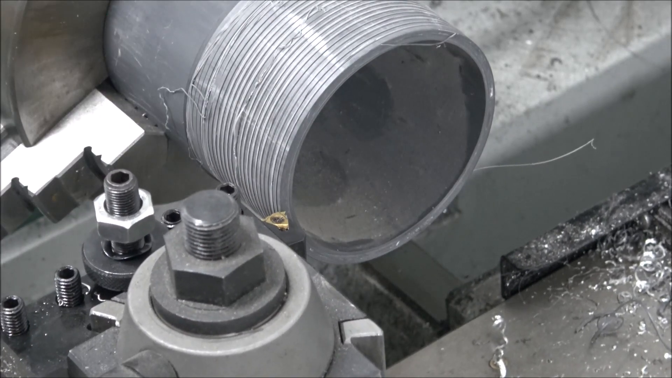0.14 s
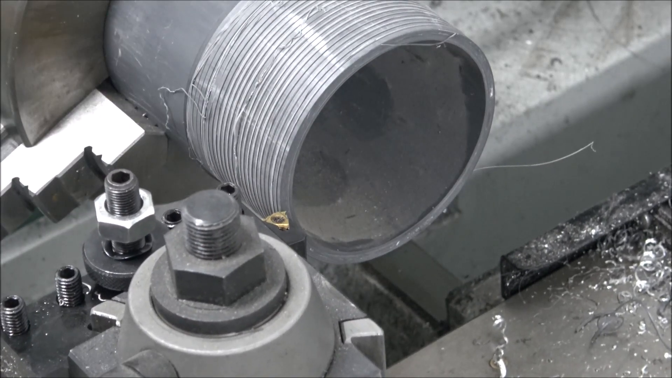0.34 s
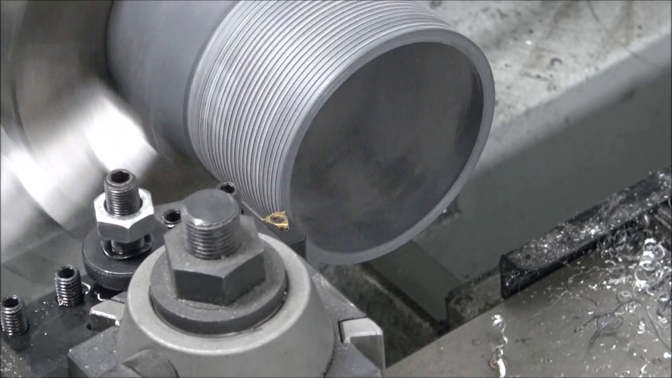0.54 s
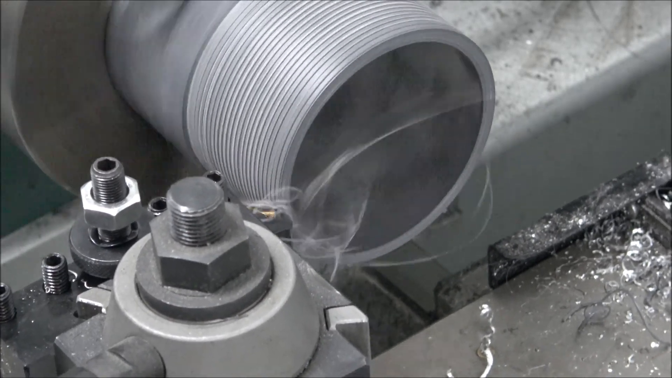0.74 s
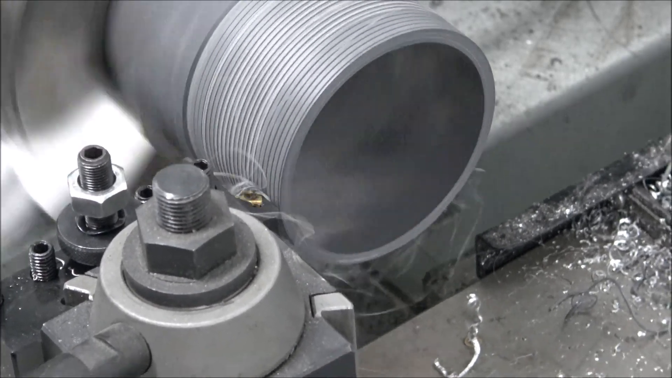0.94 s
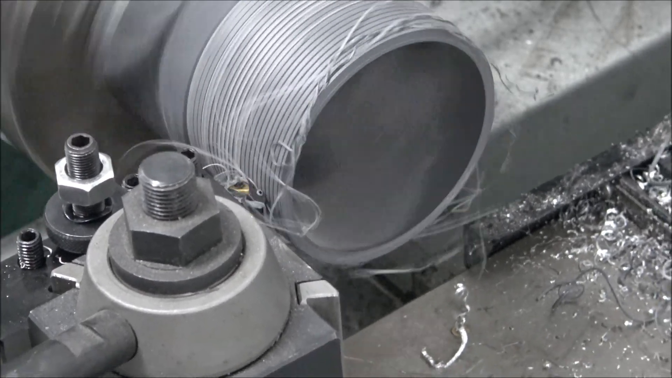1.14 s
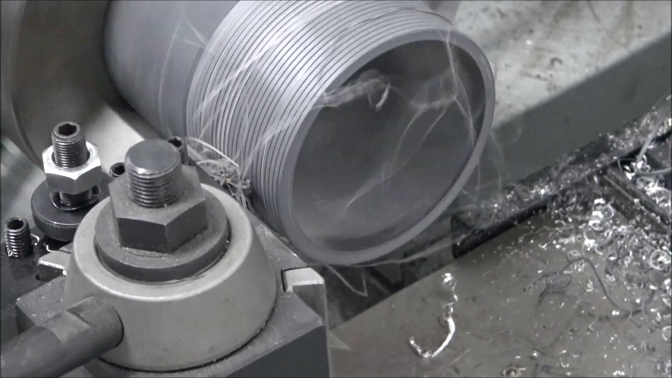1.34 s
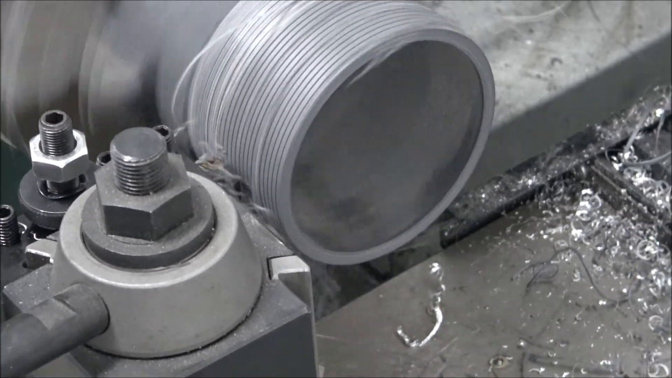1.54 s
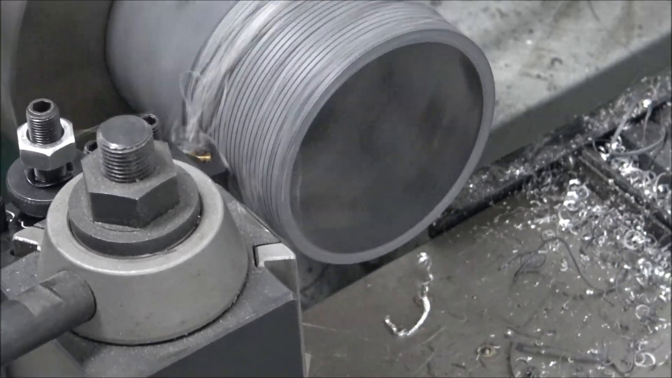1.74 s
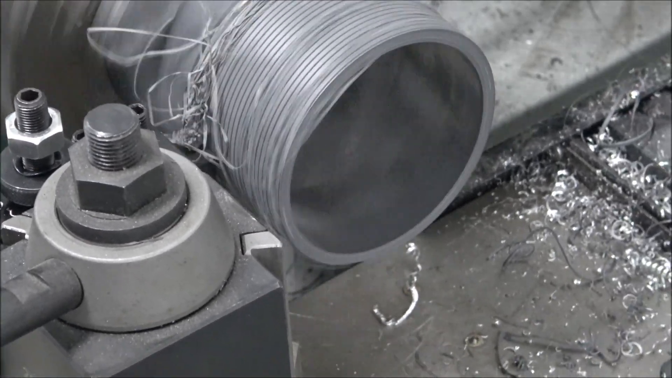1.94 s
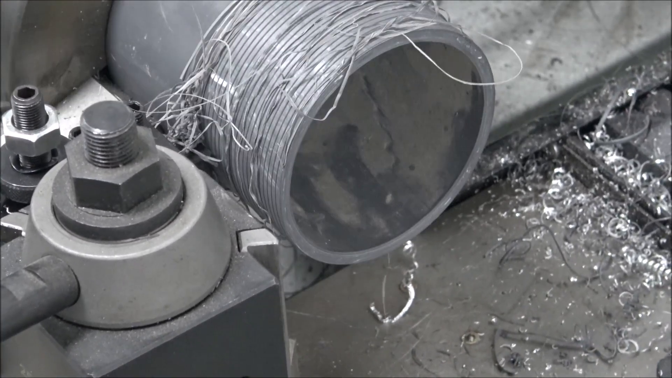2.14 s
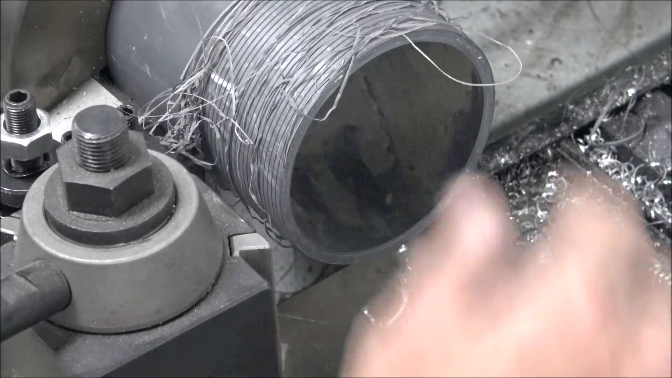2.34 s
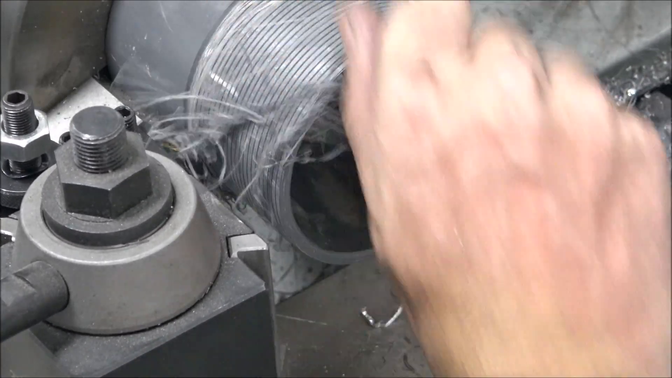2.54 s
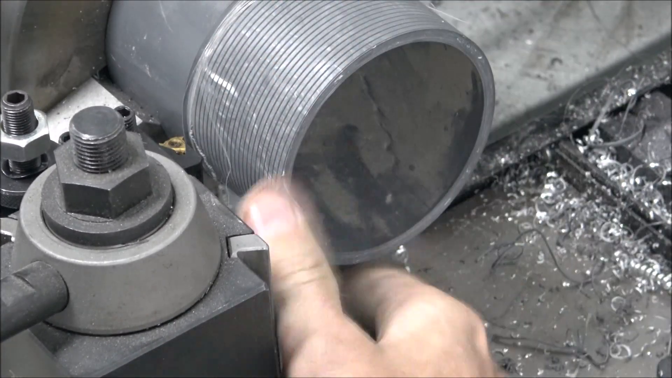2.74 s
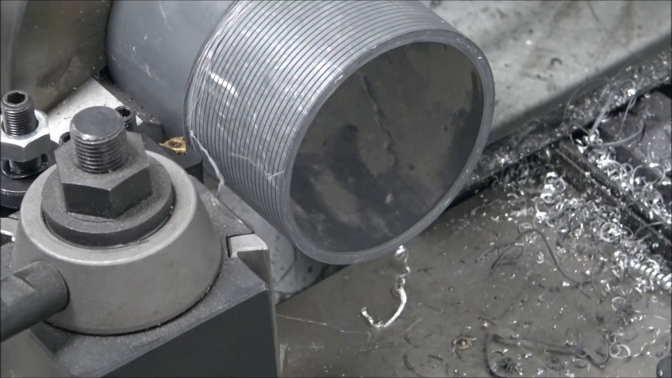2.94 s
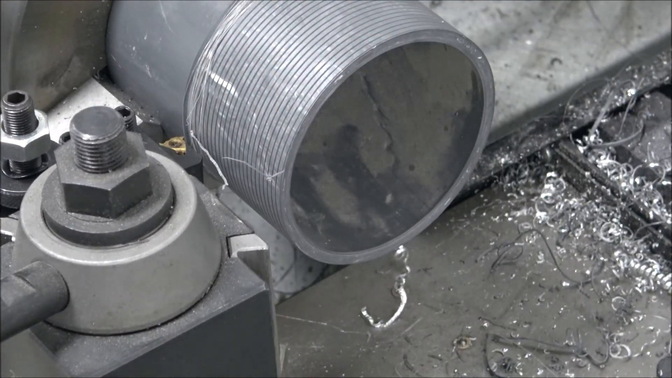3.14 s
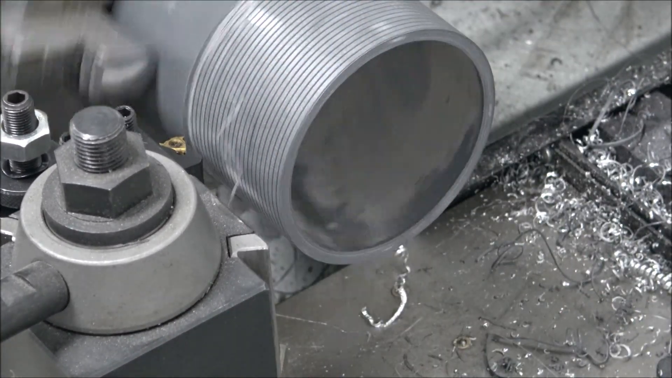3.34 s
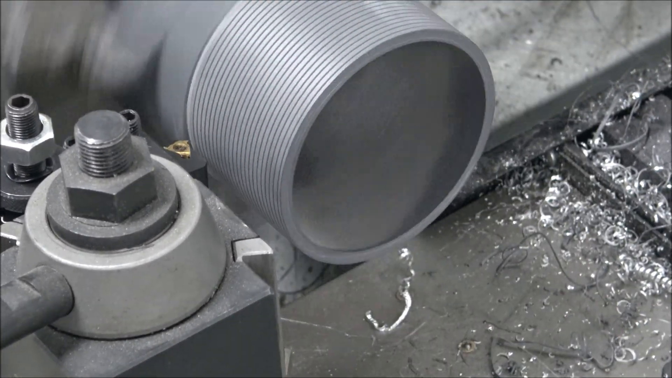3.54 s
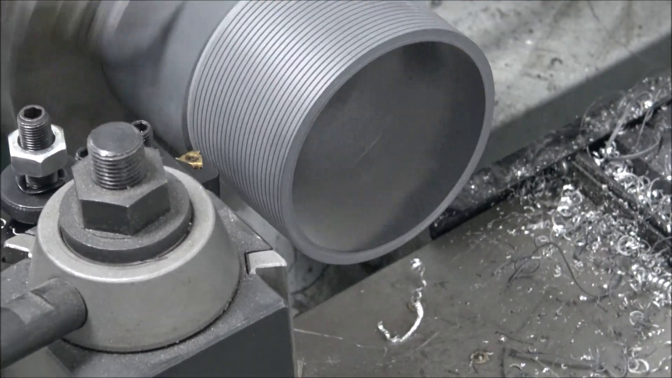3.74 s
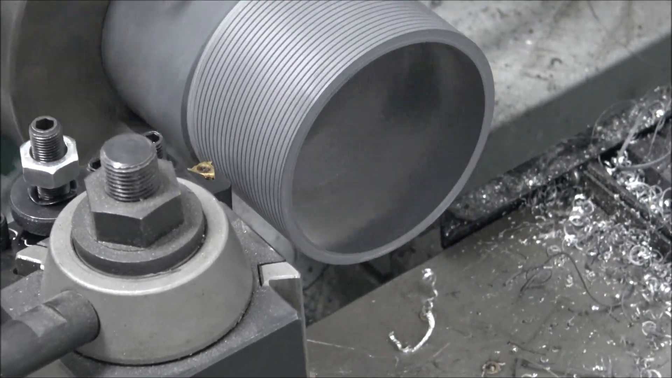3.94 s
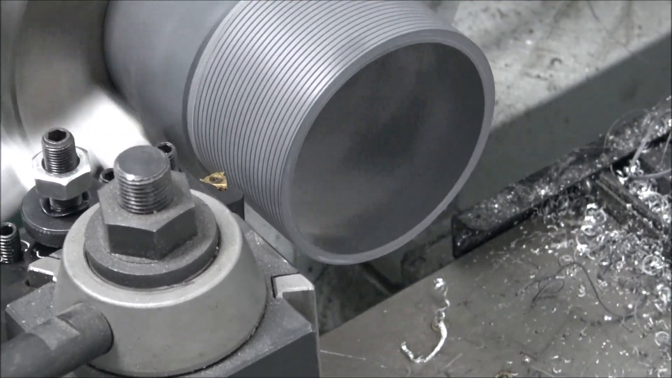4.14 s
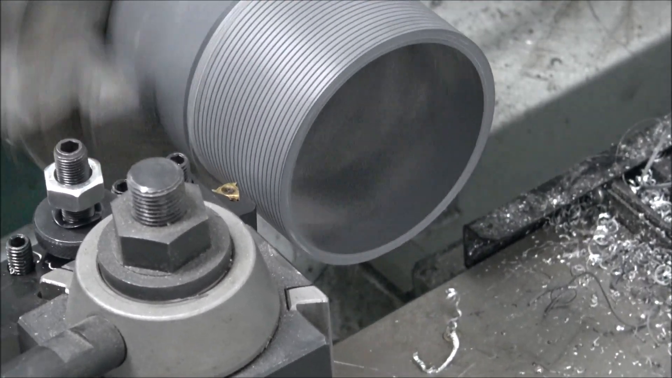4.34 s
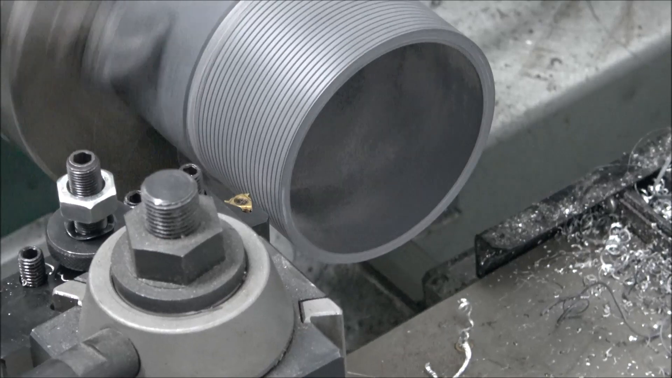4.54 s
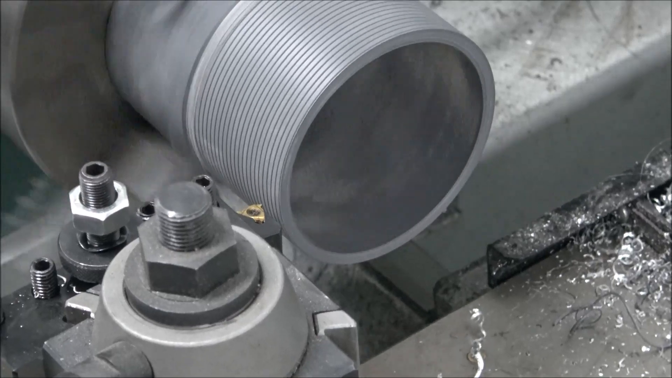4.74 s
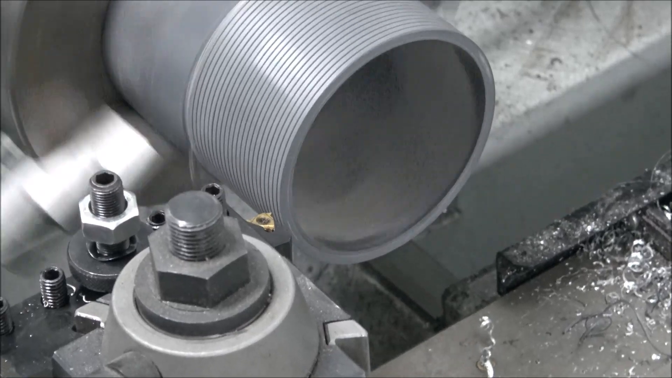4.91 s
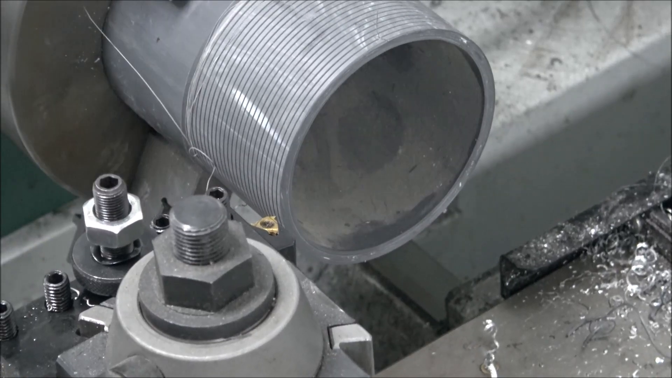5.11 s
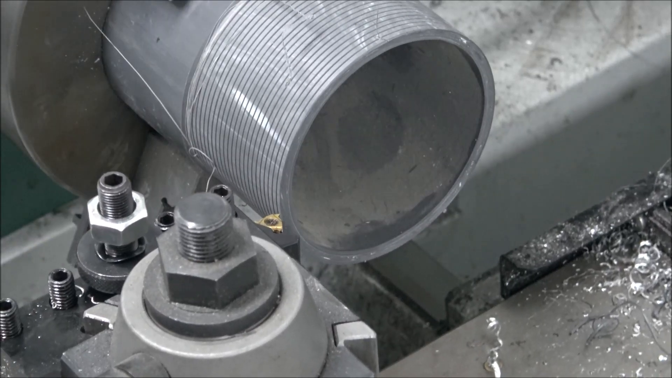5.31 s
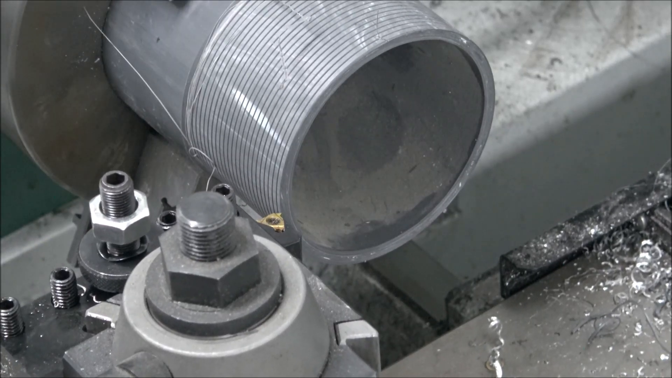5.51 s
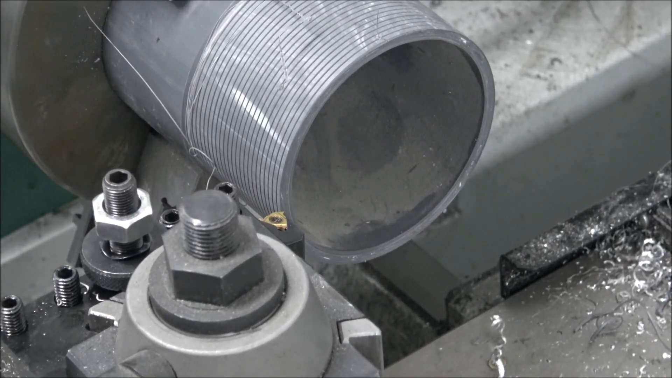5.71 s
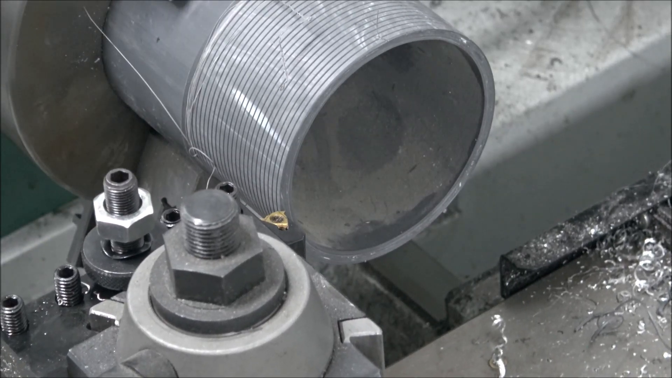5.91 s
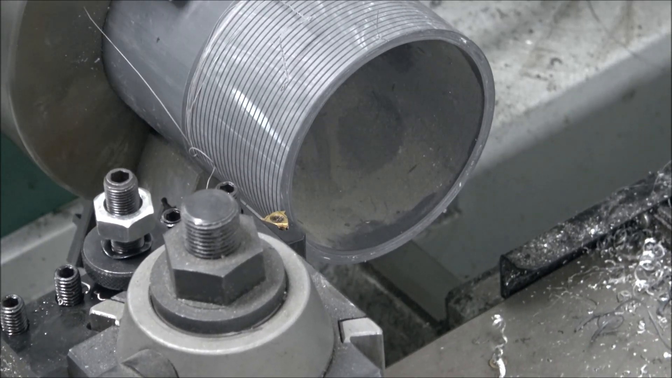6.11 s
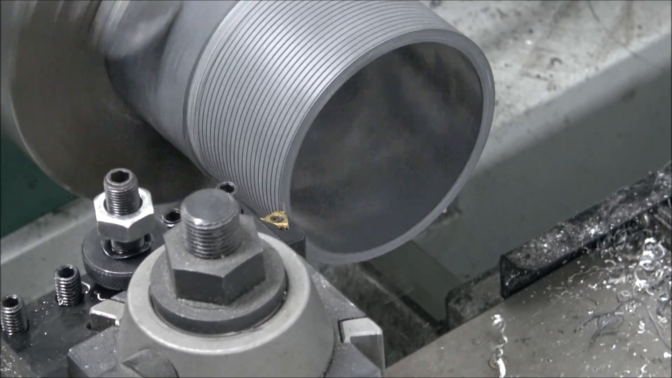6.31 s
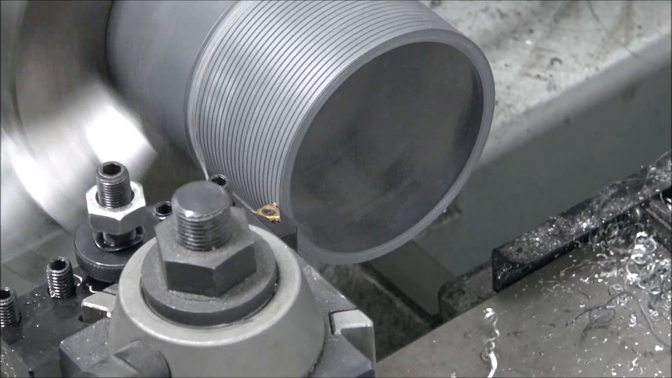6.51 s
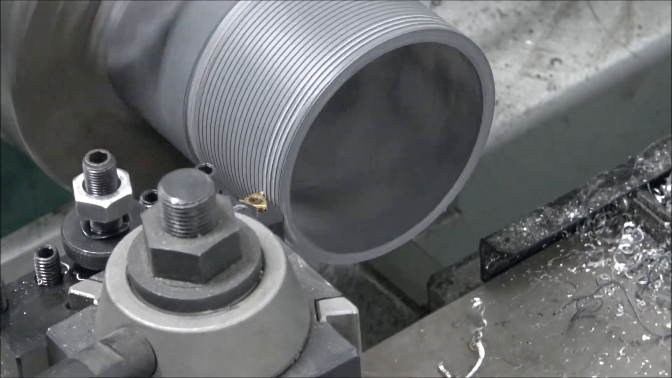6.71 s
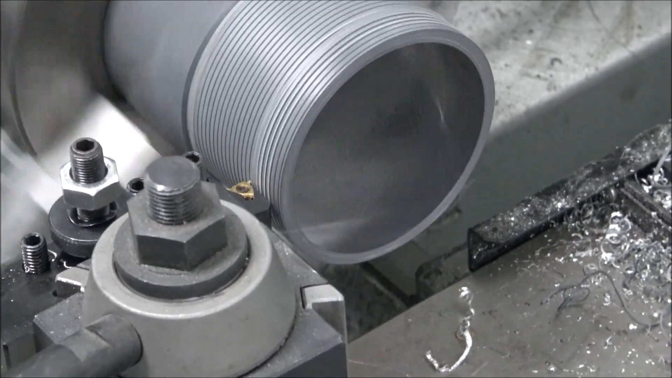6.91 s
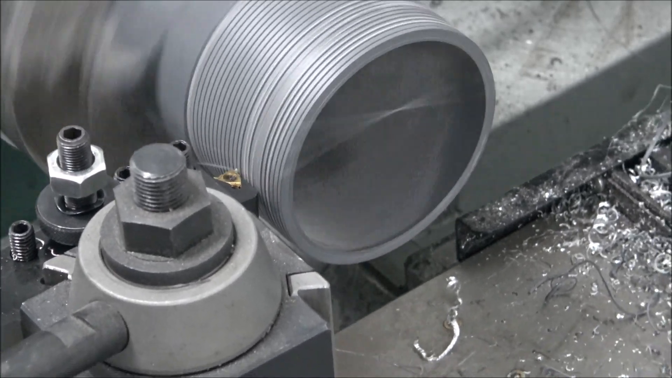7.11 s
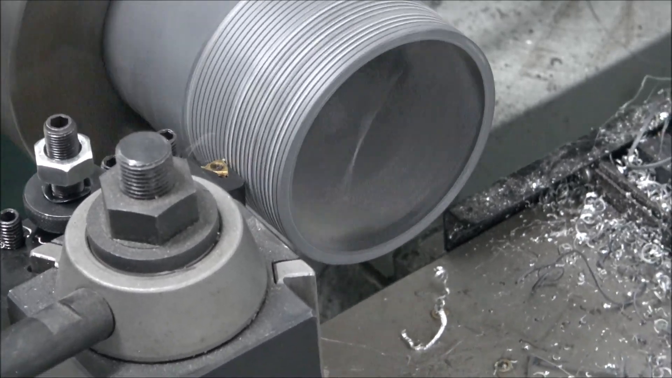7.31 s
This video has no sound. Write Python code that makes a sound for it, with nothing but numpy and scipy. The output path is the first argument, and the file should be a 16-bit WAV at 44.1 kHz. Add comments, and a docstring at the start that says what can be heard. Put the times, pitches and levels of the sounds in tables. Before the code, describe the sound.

A steady fan, airy rush over a low wavering hum, lies beneath everything in a dry workshop, heard close. Thin metal strands rustle faintly at the start. At 0.4 s gear play knocks and a lathe spins up in about 0.2 s with a rough rising howl, settling into a loud, bright gear rattle with piercing steady whines and very high drive singing; a thin whistle joins around 1.1 s. At 1.9 s a snap begins braking; pitch falls and a hard clank comes near 2.05 s. In the quiet, swarf rustles around 2.5 s and on past 3 s, with a light click at 3.2 s. A heavy knock and growling slaps at 3.35 s launch the reverse run, differently pitched, until it brakes at 4.9 s, ending in a ringing clunk near 5.05 s. Only the fan remains until 6.26 s, when softer knocks start the forward whine again, continuing to the end.

```python
"""A geared lathe threads an aluminium tube: it runs forward, is braked, runs in reverse, is braked and runs forward.
Its gears knock as their play is taken up (noise bursts), then whine (tones) and rattle (noise) in the
headstock casing, a set of resonances, while the motor drive sings high above (gliding tones).
Stringy swarf, pulled off the tube by hand, rustles as random ticks ring thin strands.
A fan hums throughout: steady tones over a rush of noise in a resonant housing."""
import sys
import numpy as np
from scipy import signal
from scipy.fft import rfft, irfft
from scipy.io import wavfile

SR = 44100
rng = np.random.default_rng(int(sys.argv[2]) if len(sys.argv) > 2 else 0)


def dump_mix(stems):
    """Bounce the given channels to the path in sys.argv[1] as a 16-bit WAV at rate SR."""
    frames = np.atleast_2d(stems).T  # one column per channel
    limited = np.clip(frames, -1, 1)  # hard clip at full scale
    pcm = np.round(limited * 32767).astype(np.int16)
    wavfile.write(sys.argv[1], SR, pcm)


N = 328986
TIME = np.arange(N) / SR   # s

# runs of the spindle: (start [s], brake [s], direction [+1 forward, -1 reverse],
# rattle level at full speed [dB], groan level while changing speed [dB], braking torque [share of starting])
SPINDLE_RUNS = [(.415, 1.903, 1, -15.5, -29, 0.38), (3.345, 4.876, -1, -16, -26, 0.38),
                (6.262, 7.6, 1, -15.5, -30.5, .3)]
# resonances of the headstock casing: (frequency [Hz], width [Hz], lift [dB])
CASING_MODES = [(244.6, 56, 14), (398, 15, 5), (802.7, 28, 12), (839.5, 63, 10), (908, 39, 8),
                (955, 33, 7.5), (1034, 43, 14.5), (1125, 19, 10), (1184, 68, 13), (1263, 87, 14.5),
                (1693, 14, 14), (1897, 62, 16.5), (2146, 110, 11.5), (2292, 71, 7.5), (2640, 120, 9),
                (2663, 63, 6.5), (2762, 60, 5.5), (2867, 59, 13.5), (3015, 62, 6), (3133, 45, 11.5),
                (3230, 52, 9.5), (3470, 53, 10), (3552, 120, 7), (3670, 46, 11), (3852, 94, 12.5),
                (4270, 104, 7.5), (4574, 38, 12), (4880, 71, 7.5), (4860, 75, -2), (5470, 18, 12.5)]
# colour of the tooth rattle in forward, also of the clang of a knock: (frequency [Hz], relative level [dB])
FORWARD_RATTLE_COLOUR = [(30, -29), (60, -20), (125, -14), (190, -22), (300, -10), (500, -6), (1000, -6),
                         (1500, 2), (2300, 3.5), (3400, -1), (5200, 7.5), (8000, -2), (12000, -7.5),
                         (15500, -6.5)]

SHAFT_HZ = 16.39   # turns a second at full speed
SPIN_UP_S, BRAKE_S = .19, .2   # the drive ramps the motor up and down


def gear_train():
    """Forward and reverse load opposite flanks of the teeth, each with its own tones."""
    # gear mesh and motor slot tones at full speed: (frequency [Hz], level [dB])
    forward_tones = [(425, -49.5), (573, -43.5), (1179.5, -24), (2359, -24), (2509, -34), (2612, -23),
                     (2735, -36), (3087, -35), (3540, -28), (4646, -31), (10042, -39)]
    reverse_tones = [(409, -42), (570, -38), (1136, -22), (1281, -31), (1846, -31.5), (2514, -20.5),
                     (2864, -28.5), (9674, -34)]
    # switching sidebands of the motor drive at full speed: (frequency [Hz], level [dB])
    forward_sidebands = [(12193, -48), (12672, -36), (13631, -50), (14104, -38), (14809, -44), (15402, -49)]
    reverse_sidebands = [(12791, -42), (13491, -44), (13717, -38), (14174, -38), (14853, -40), (15197, -49),
                         (15310, -43), (15542, -51)]
    # colour of the tooth rattle in reverse: (frequency [Hz], relative level [dB])
    reverse_rattle_colour = [(30, -23), (80, -21), (155, -18), (195, -26), (300, -17.5), (700, -0.5),
                             (1000, -6), (1500, 1), (2300, 3.5), (3400, 0), (5200, 5), (8000, 0),
                             (12000, -6.5), (15500, -11)]

    speed, strain, rattling, groaning = motion()
    ahead = np.maximum(speed, 0)
    back = np.maximum(-speed, 0)
    modes = CASING_MODES + upper_modes()

    # the third tone of each list sets the beat of the rattle
    forward = rattling * rattle(ahead, forward_tones[2][0], FORWARD_RATTLE_COLOUR, modes)
    forward += whine(ahead, forward_tones)
    forward += whoop(ahead, strain, mesh_hz=2602, drive_db=-16.5)
    forward += singing(ahead, forward_sidebands)
    forward += settled_tone(ahead)

    reverse = rattling * rattle(back, reverse_tones[2][0], reverse_rattle_colour, modes)
    reverse += whine(back, reverse_tones)
    reverse += whoop(back, strain, mesh_hz=2900, drive_db=-17.0)
    reverse += singing(back, reverse_sidebands)
    return np.where(speed < 0, reverse, forward) + groan(groaning)


def motion():
    """Ramp, hold and brake each run; give signed speed (1 is full), tooth strain, rattle and groan strengths."""
    brake_bend = 1.45   # above 1 the brake bites harder towards the stop
    slip, slip_s = .03, .14   # share of speed still lacking after the ramp, and the time to make it up
    rattle_law = 0.78   # the rattle's strength grows with this power of the speed
    strain_release_s = 0.045   # torque eases after the ramp
    # the groan dies away after each ramp, down to this share at steady speed
    groan_release_s, running_groan = 0.048, 0.037

    speed, strain, rattling, groaning = np.zeros((4, N))
    for start, brake, direction, rattle_db, groan_db, brake_strain in SPINDLE_RUNS:
        at_speed = start + SPIN_UP_S
        rising = ramp(start, SPIN_UP_S)
        falling = ramp(brake, BRAKE_S)
        pace = rising * (1 - slip * fade(at_speed, slip_s)) * (1 - falling ** brake_bend)
        braking = ramp(brake, BRAKE_S / 10) * fade(brake + BRAKE_S, groan_release_s)
        starting = ramp(start, SPIN_UP_S / 2) * fade(at_speed, groan_release_s)
        speed += np.sign(direction) * pace
        strain += np.sqrt(rising) * fade(at_speed, strain_release_s) + brake_strain * braking
        rattling += from_db(rattle_db) * pace ** rattle_law
        groaning += from_db(groan_db) * (starting + braking + running_groan * pace)
    return speed, strain, rattling, groaning


def rattle(speed, mesh_hz, colour, modes, pulsing=0.37, throb_db=.5, boom_db=4, boom_hz=1150):
    """Teeth slap and slide in step with the mesh and ring the casing; slow gears sound duller."""
    travel = np.cumsum(speed) / SR   # seconds' worth of full speed
    pulse = 1 + pulsing * np.cos(2 * np.pi * mesh_hz * travel)
    contact = pulse * from_db(throb_db * tooth_errors(SHAFT_HZ * travel))
    sound = body(rng.standard_normal(N) * contact, colour, modes)
    boom_filter = signal.butter(1, boom_hz, fs=SR, output="sos")
    low = high_pass(signal.sosfilt(boom_filter, sound), hz=220)
    slowness = np.clip(1 - speed, 0, 1)
    boosted = sound + (from_db(boom_db * slowness) - 1) * low
    return boosted * from_db(-3 * slowness)


def whine(speed, tones, uneven=0.16, rough=0.12, smear=1.0):
    """Mesh tones follow the speed; they are blurred and weak until the gears near full speed, the high ones longest."""
    travel = np.cumsum(speed) / SR
    out = np.zeros(N)
    blur = rough + smear * np.sqrt(np.clip(.99 - speed, 0, 1))   # phase wobble, radians
    for hz, db in tones:
        strength = 1 + uneven * tooth_errors(SHAFT_HZ * travel) + rough * drift(28)
        settled = speed ** (2 + hz / 400)
        tone = np.sin(2 * np.pi * hz * travel + blur * drift(57))
        out += from_db(db) * settled * strength * tone
    return np.sqrt(2) * out


def whoop(speed, strain, mesh_hz, drive_db, direct=0.8):
    """Starting and braking torque makes the loaded mesh howl in a rough gliding band, direct and through the casing."""
    spread_hz = 185   # how fast the band's strength wanders, which sets its width
    phase = 2 * np.pi * mesh_hz * np.cumsum(speed) / SR
    engaged = np.clip((speed - .48) / .12, 0, 1)   # only above about half speed
    rough_tone = drift(spread_hz) * np.sin(phase) + drift(spread_hz) * np.cos(phase)
    band = strain * engaged * rough_tone
    through_casing = body(band, [(1500, 0.5), (2600, -2)], CASING_MODES)
    return from_db(drive_db) * (direct * band + 0.17 * through_casing)


def singing(speed, sidebands, waver=.15, starting=0.22):
    """Drive sidebands glide down from the switching frequency and grow clear as the motor reaches its speed."""
    switching_hz = 16000
    out = np.zeros(N)
    for hz, db in sidebands:
        pitch_hz = switching_hz + (hz - switching_hz) * speed
        out += from_db(db) * np.sin(2 * np.pi * np.cumsum(pitch_hz) / SR + waver * drift(25))
    clearness = starting * (speed > 0) + (1 - starting) * speed ** 12
    return np.sqrt(2) * out * clearness


def settled_tone(speed, waver=.3):
    """A thin whistle that follows the speed grows late in each forward run and stops with the brake."""
    whistle_hz, whistle_db = 8320, -33.5   # at full speed
    after_s, swell_s = 0.65, 0.21
    present = np.zeros(N)
    for start, brake, direction, *_ in SPINDLE_RUNS:
        if direction > 0:
            present += ramp(start + after_s, swell_s) * (1 - ramp(brake, BRAKE_S / 10))
    tone = np.sin(2 * np.pi * whistle_hz * np.cumsum(speed) / SR + waver * drift(30))
    return np.sqrt(2) * from_db(whistle_db) * present * tone


def groan(strength, attack_s=0.006):
    """Uneven tooth slaps growl in the casing's low resonances, most while speed changes; a few stand out."""
    # heavy tooth slaps while the gears turn slowly: (start [s], level [dB])
    heavy_slaps = [(3.359, -24), (3.402, -22.5), (3.467, -20), (4.968, -25), (5.007, -25), (5.05, -23),
                   (6.29, -30)]
    # colour of the chatter: (frequency [Hz], relative level [dB])
    chatter_colour = [(100, -41), (300, -31), (530, -4.5), (690, 1.5), (800, 0), (1000, -3), (1270, -5),
                      (1600, -1.5), (3000, -37), (15500, -61)]
    decay_s = 0.02
    slaps = sum(from_db(db) * ramp(s, attack_s) * fade(s + attack_s, decay_s) for s, db in heavy_slaps)
    return (strength + slaps) * body(rng.standard_normal(N), chatter_colour, CASING_MODES)


def tooth_errors(turns, count=10):
    """An uneven pattern that comes round again with each turn of the shaft."""
    angle = np.linspace(0, 1, 257)   # in turns
    pattern = np.zeros(len(angle))
    for k in range(1, count + 1):
        pattern += rng.standard_normal() * np.cos(2 * np.pi * (k * angle + rng.random()))
    return np.interp(turns % 1, angle, rms_one(pattern))


def upper_modes(count=240, width_hz=36):
    """Above its main resonances the casing has a thicket of narrow ones."""
    centres = np.linspace(5000, 15800, count) + rng.uniform(-25, 25, count)
    return [(hz, width_hz, rng.uniform(-4, 4)) for hz in centres]


def knocks(thud_t60=0.2):
    """Each knock is a burst of bounces: a bright snap, the casing ringing and a longer thud of the bed."""
    # knocks of lever and gear play: (start [s], snap level [dB], casing ring level [dB], thud level [dB],
    # time for snap and ring to fall by 60 dB [s])
    knock_list = [(.402, -20, -20, -31, 0.1), (.437, -25, -41, -34, .08), (1.92, -12, -39, -40, 0.033),
                  (2.055, -13, -8, -53, 0.079), (2.072, -30, -33.5, -34, 0.071),
                  (3.185, -23.5, -38, -56.5, 0.24), (3.214, -36, -29, -41, 0.15),
                  (3.337, -22, -42, -47, 0.075), (3.356, -12.5, -17.5, -34.5, 0.092),
                  (5.045, -22, -12.5, -30, 0.17), (5.068, -28, -39, -27.5, 0.078),
                  (6.259, -25, -31, -35, 0.13), (6.289, -20, -33, -32, 0.083)]
    # colour of the snap: (frequency [Hz], relative level [dB])
    snap_colour = [(100, -55), (700, 12), (2500, -29.5), (4800, 6.5), (8000, 5.5), (15500, -3)]
    thud_colour = [(40, -19), (195, -20), (245, -10.0), (330, -8.5), (550, -2), (800, -28), (3000, -66)]

    snap, clang, thud = np.zeros((3, N))
    for s, snap_db, ring_db, thud_db, t60 in knock_list:
        start = int(s * SR)
        age = TIME[:min(SR // 2, N - start)]
        span = slice(start, start + len(age))
        snap[span] += from_db(snap_db - 60 * age / t60)
        clang[span] += from_db(ring_db - 60 * age / t60)
        thud[span] += from_db(thud_db - 60 * age / thud_t60)
    bounces = rng.standard_normal((3, N))
    bed = body(thud * bounces[2], thud_colour, CASING_MODES)
    bright = body(snap * bounces[0], snap_colour, CASING_MODES)
    bright += body(clang * bounces[1], FORWARD_RATTLE_COLOUR, CASING_MODES)
    return high_pass(bed, hz=90) + high_pass(bright, hz=300)


def swarf(per_s=2000, low_hz=3600, width_hz=200, count=20):
    """Thin strands tick against the thread, each in its own spurts, with a dry scrape and a short bright ring."""
    # rustles of swarf, each swelling and fading: (middle [s], half length [s], level of the ringing [dB])
    rustles = [(.15, .2, -38.5), (.42, .08, -38), (2.48, 0.11, -40), (2.573, 0.01, -34), (2.63, .09, -45),
               (3.12, 0.52, -40)]
    high_hz, clump_db = 9500, 3   # highest strand; how unevenly each strand's ticks come and go
    ticks = (rng.random(N) < per_s / SR) * rng.choice([-1, 1], N)
    strand = rng.integers(0, count, N)   # which strand each tick strikes
    rings = np.zeros(N)
    for k, hz in enumerate(np.geomspace(low_hz, high_hz, count)):
        struck = ticks * (strand == k) * from_db(clump_db * drift(9))
        rings += ring(struck, hz, width_hz)
    scrape = from_db(3) * high_pass(rms_one(ticks), hz=7000)
    strength = sum(from_db(db) * swell(s, half) for s, half, db in rustles)
    return strength * (rms_one(rings) + scrape)


def fan(rush_db=-29.5, flutter_db=1.1, hum_waver_db=2.5, waver_db=0.5, wander=0.46):
    """Air rushes through a resonant housing under a slowly beating hum and wavering motor tones."""
    # colour of the rush: (frequency [Hz], relative level [dB])
    rush_colour = [(25, -46), (50, -43), (120, -12), (200, -19), (400, -14.5), (700, -6.5), (1000, 2.5),
                   (1500, -6.5), (2300, -1), (3500, -6.5), (7000, -9.5), (11000, -13), (15500, -19.5)]
    # resonances of the fan's housing: (frequency [Hz], width [Hz], lift [dB])
    housing_modes = [(320, 55, 13), (393, 16, 13.5), (526, 37, 5), (793, 19, 4.5), (866, 27, 5.5),
                     (1184, 65, 5), (1307, 27, 12), (1454, 37, 7.5), (1712, 145, 6.5), (1940, 37, 9.5),
                     (2180, 260, 4)]
    # tones above the hum: (frequency [Hz], middle level [dB])
    motor_tones = [(985.2, -51), (2492, -51), (2676, -41.5), (2950, -57), (6110, -50.5), (7628, -51),
                   (9162, -48)]
    # slowly beating parts of the hum: (multiple of its pitch, middle level [dB], beat depth [dB], crest [s])
    hum_partials = [(1, -44.5, 1.7, .1), (2, -52.5, 6, .1)]
    # brief swells of the hum: (middle [s], half length [s], lift [dB])
    hum_swells = [(.26, 0.096, 0), (6.27, 0.092, 5.5)]
    hum_hz, beat_s = 327.3, 3.11

    rush = from_db(rush_db + flutter_db * drift(16)) * body(rng.standard_normal(N), rush_colour, housing_modes)
    hum_phase = 2 * np.pi * hum_hz * TIME + wander * drift(8.6)
    hum = np.zeros(N)
    for multiple, db, beat_db, crest in hum_partials:
        beat = beat_db * np.cos(2 * np.pi * (TIME - crest) / beat_s)
        hum += from_db(db + beat + hum_waver_db * drift(2.5)) * np.sin(round(multiple) * hum_phase)
    hum *= from_db(sum(db * swell(s, half) for s, half, db in hum_swells))
    tones = np.zeros(N)
    for hz, db in motor_tones:
        tones += from_db(db + waver_db * drift(13.0)) * np.sin(2 * np.pi * hz * TIME + wander * drift(3))
    return rush + np.sqrt(2) * (hum + tones)


def workshop(x, t60=0.08):
    """Both ears hear the sound, its middle range a little to the left; weak reflections differ between them."""
    # colour of the reflections: (frequency [Hz], relative level [dB])
    reflection_colour = [(80, -37), (190, -5), (300, 6.5), (550, -2), (1100, 12), (2300, 13.5), (5000, 8.5),
                         (9000, -14), (14000, 9.5)]
    side_db, lean_db = -24.5, -30
    age = TIME[:SR // 4]
    dying_away = rms_one(from_db(-60 * age / t60)) / np.sqrt(len(age))
    echoes = rng.standard_normal(len(age)) * dying_away
    middle_band = signal.butter(1, [130, 4000], "band", fs=SR, output="sos")
    lean = signal.sosfilt(middle_band, high_pass(x, hz=110))
    reflected = body(signal.oaconvolve(x, echoes)[:N], reflection_colour, [])
    side = from_db(side_db) * reflected + from_db(lean_db) * lean
    return np.array([x + side, x - side])


def dip_db():
    """The level drops quickly early in the first run, creeps up for a while and then returns."""
    at_s, attack_s, hold_s, release_s = 0.65, 0.022, 1.56, 0.29
    first_depth_db, creep_db_per_s = 4.5, 1
    depth = first_depth_db - creep_db_per_s * (TIME - at_s)
    return -depth * ramp(at_s, attack_s) * (1 - ramp(at_s + hold_s, release_s))


def from_db(db):
    """Decibels to gain."""
    return 10 ** (np.asarray(db) / 20)


def rms_one(x):
    """Scale to an rms (average strength) of 1."""
    return x / np.sqrt(np.mean(np.abs(x) ** 2) + 1e-20)


def ramp(start, length):
    """Rises in a straight line from 0 to 1."""
    return np.clip((TIME - start) / length, 0, 1)


def fade(start, decay_s):
    """Stays at 1 until the start, then dies away."""
    return np.exp(-np.maximum(TIME - start, 0) / decay_s)


def swell(middle, half):
    """A smooth bump of height 1."""
    return np.exp(-((TIME - middle) / half) ** 2)


def drift(rate):
    """Smooth random wandering of rms 1 that changes about rate times a second."""
    r = np.exp(-40 * np.pi * rate / SR)   # made at every 20th sample, then joined up
    noise = rng.standard_normal(N // 20 + 2002)
    slow = signal.lfilter([1], [1, -2 * r, r * r], noise)[2000:]   # skip the filter's run-in
    return np.interp(np.arange(N) / 20, np.arange(len(slow)), rms_one(slow))


def high_pass(x, hz):
    """Second-order low cut."""
    return signal.sosfilt(signal.butter(2, hz, "high", fs=SR, output="sos"), x)


def ring(x, hz, width):
    """One resonance; a narrower width in Hz rings longer."""
    r = np.exp(-np.pi * width / SR)
    return signal.lfilter([1, 0, -1], [1, -2 * r * np.cos(2 * np.pi * hz / SR), r * r], x + 1e-18)


def resonance_db(modes, hz):
    """Lift that a set of resonances gives at these frequencies."""
    return sum(db / (1 + (2 * (hz - centre) / width) ** 2) for centre, width, db in modes)


def body(x, spectrum, modes):
    """Causal filter with a broad colour and resonances; white noise keeps its power."""
    size = 8192
    hz = np.maximum(np.arange(size // 2 + 1) * SR / size, 1)
    knots, level_db = np.transpose(spectrum)
    colour_db = np.interp(np.log(hz), np.log(knots), level_db)
    gain = rms_one(from_db(colour_db + resonance_db(modes, hz)))
    cepstrum = irfft(np.log(gain))   # folding it gives the minimum-phase response
    cepstrum[1:size // 2] *= 2
    cepstrum[size // 2 + 1:] = 0
    response = irfft(np.exp(rfft(cepstrum)))[:size // 2]
    return signal.oaconvolve(x, response)[:N]


def scene():
    """The lathe in its workshop."""
    return workshop(gear_train() + knocks() + swarf() + fan())


def record(dry):
    """The level dips and recovers, the highest peaks are rounded and the top is cut."""
    cutoff_hz = 15800
    x = dry * from_db(dip_db())
    rounded = x / (1 + (x / .8) ** 6) ** (1 / 6)   # never passes 0.8
    return signal.sosfilt(signal.ellip(12, .1, 90, cutoff_hz, fs=SR, output="sos"), rounded)


dry = scene()
out = record(dry)
dump_mix(out)
```